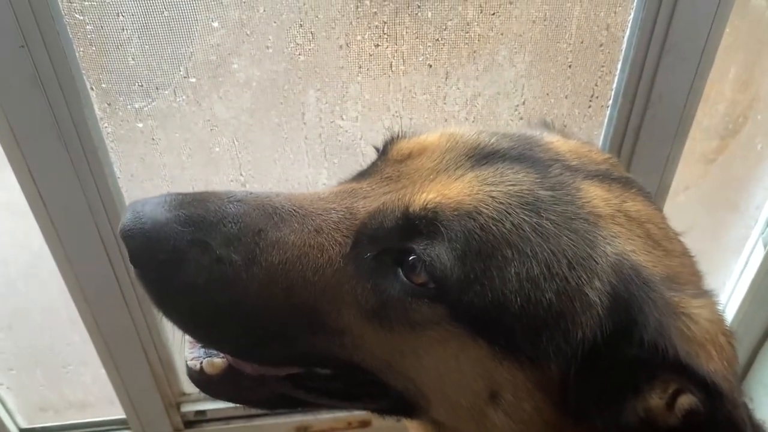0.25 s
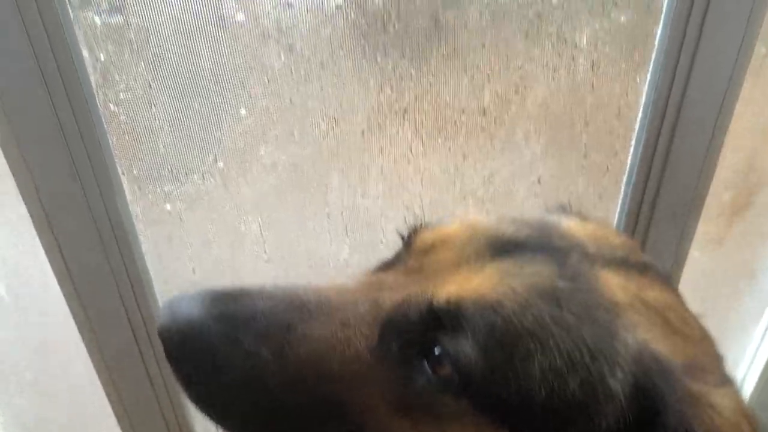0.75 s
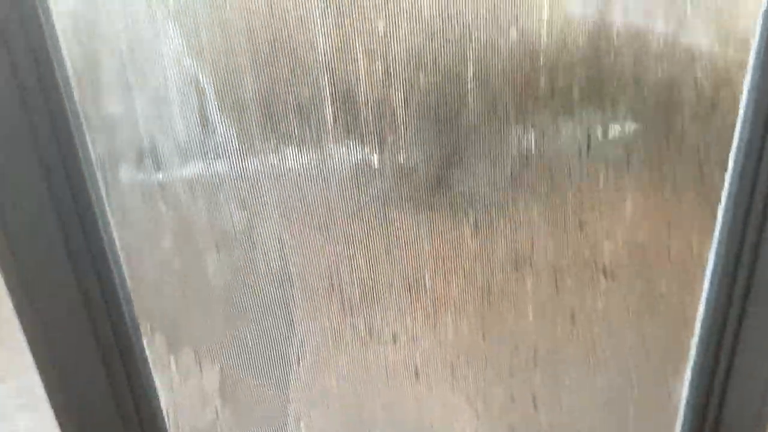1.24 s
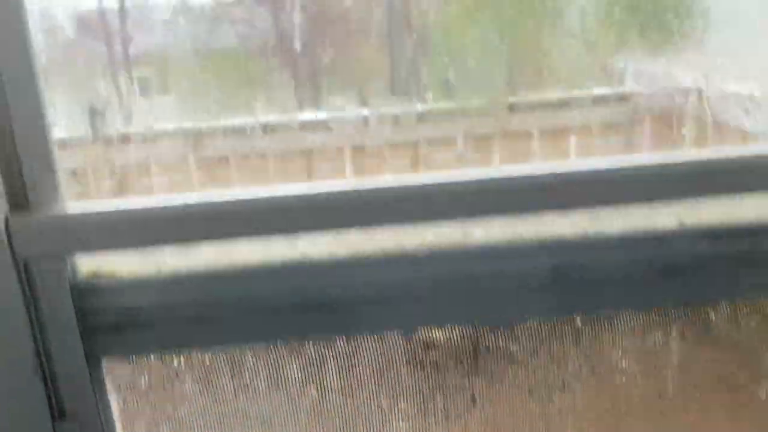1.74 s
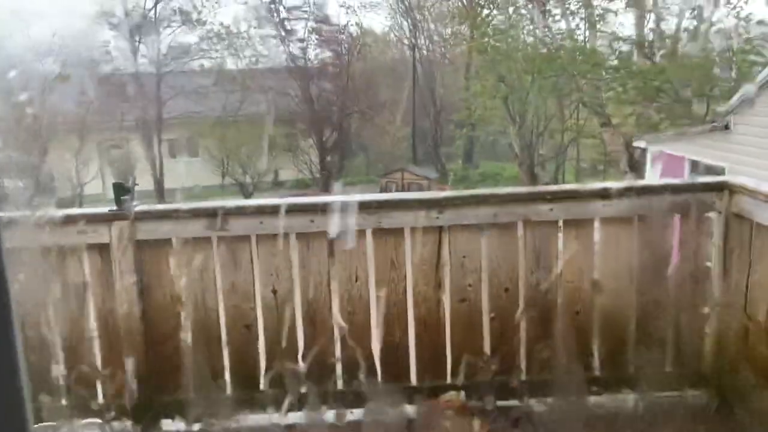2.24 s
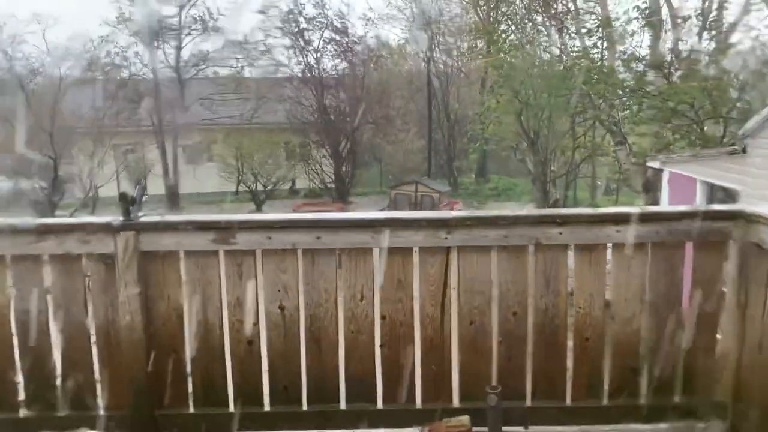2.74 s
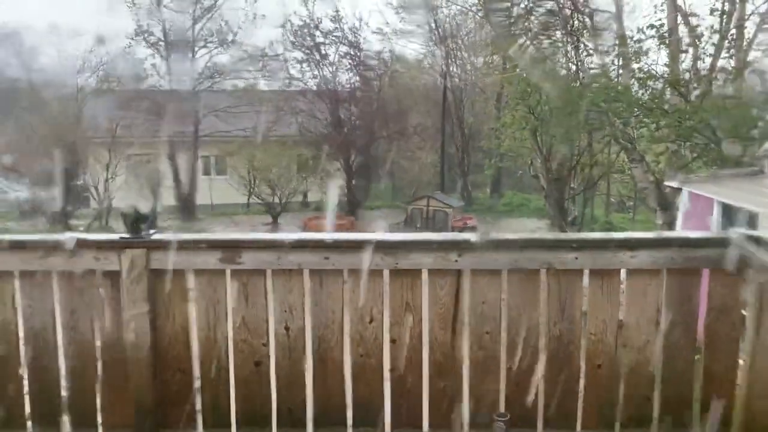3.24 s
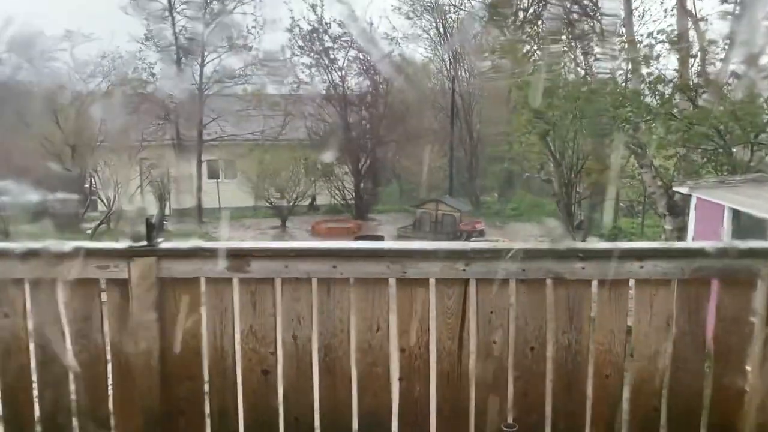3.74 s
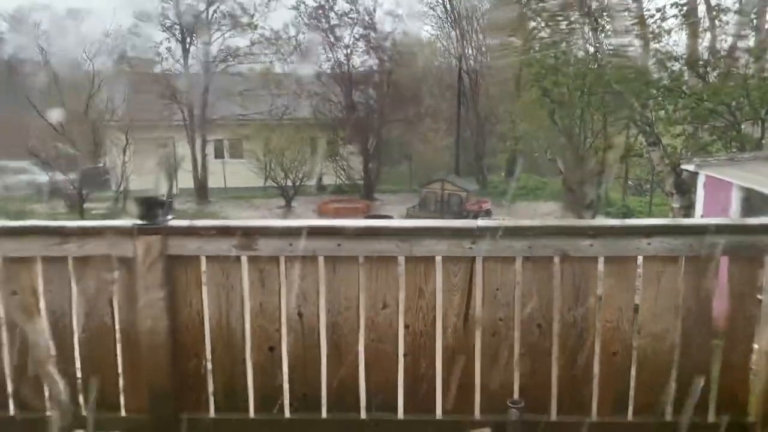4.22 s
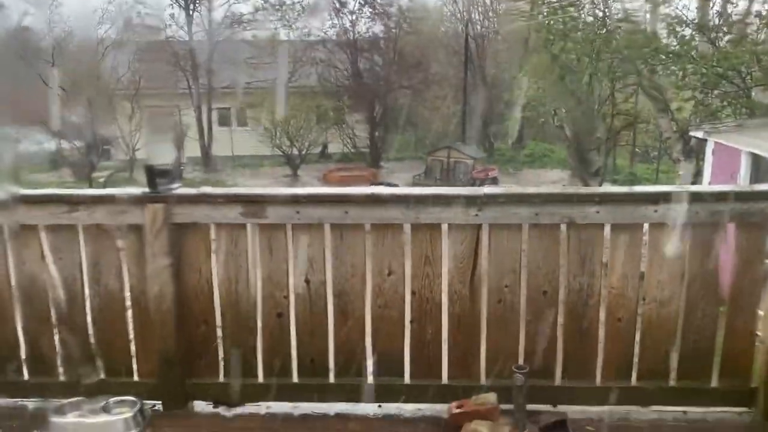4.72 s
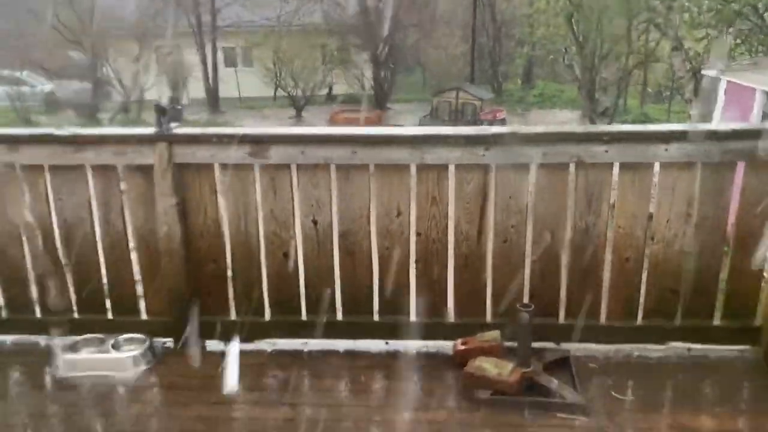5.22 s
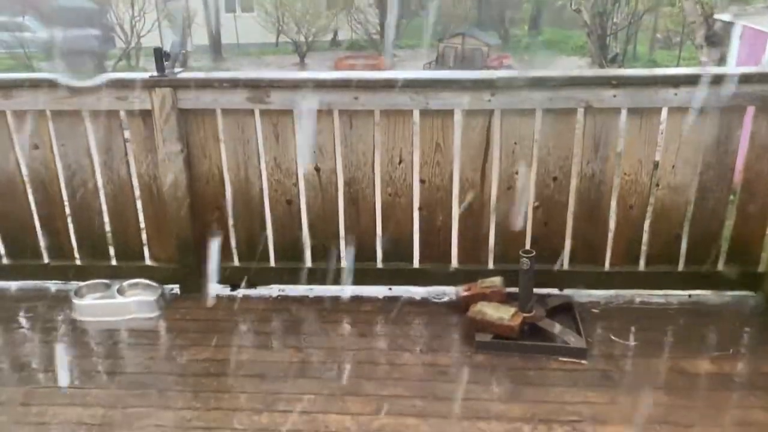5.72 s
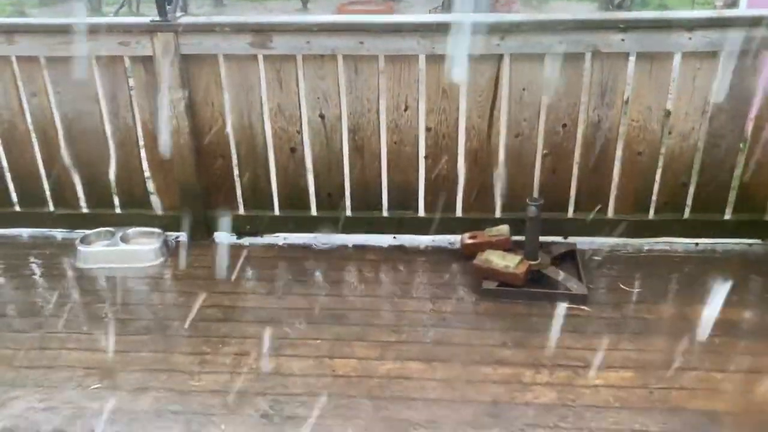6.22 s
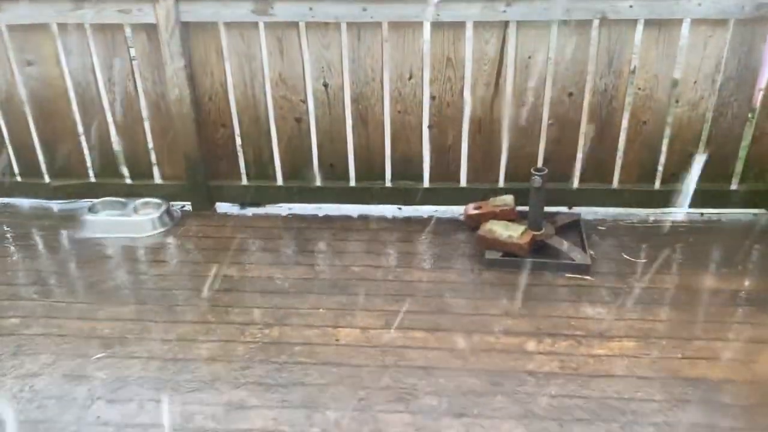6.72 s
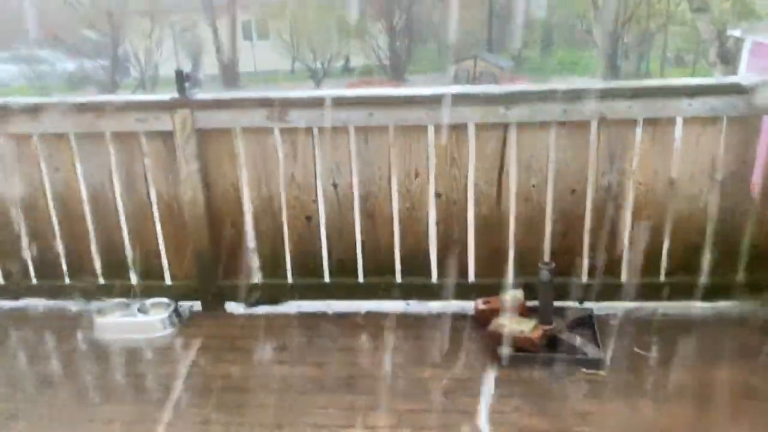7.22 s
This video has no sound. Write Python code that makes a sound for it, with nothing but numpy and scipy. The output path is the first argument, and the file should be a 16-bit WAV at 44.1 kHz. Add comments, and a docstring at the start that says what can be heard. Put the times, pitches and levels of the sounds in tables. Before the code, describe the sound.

Heard from just behind a screened window, a dense downpour hisses steadily over a low drumming on roof and deck that slowly swells. Sharp hailstones crack and tick on pane and sill from the very start, sparse at first, then more frequent. Fat drops and pellets clack on wet boards, small gushes slap, and later a few heavy knocks and low thuds shake the window. Handheld phone, close stereo.

```python
"""Heavy rain and hail on a wooden deck

Heard from just behind a screened window. Shaped noise gives the far hiss and the drumming of roof and deck,
which grows; brief damped sines give the near drops. Hailstones and pellets are short noise bursts, and pane
and wooden frame ring in decaying modes; the pane also gives a few low thuds. A phone's two ports listen."""
import sys
import numpy as np
from scipy import signal
from scipy.fft import rfft, irfft, next_fast_len
from scipy.io import wavfile
from scipy.ndimage import uniform_filter1d, map_coordinates

SR = 44100
rng = np.random.default_rng(int(sys.argv[2]) if len(sys.argv) > 2 else 0)


def file_out(sig):
    """Save sig as 16-bit WAV at sys.argv[1]."""
    # one column per channel
    cols = np.atleast_2d(sig).T
    # limit, then scale
    lim = np.clip(cols, -1, 1)
    pcm = np.round(lim * 32767).astype(np.int16)
    wavfile.write(sys.argv[1], SR, pcm)


N = 328986

# Low knock of pane or frame, noise spectrum. Each row: frequency in Hz, level in dB.
KNOCK_SPECTRUM = [(100, 0), (400, -25), (800, -6), (1500, -7), (2200, -10), (5000, -47)]


def amp(db):
    """Decibels to gain."""
    return 10 ** (np.asarray(db) / 20)


def unit(x):
    """Scale to rms 1."""
    return x / np.sqrt(np.mean(x ** 2) + 1e-20)


def along(points, hz):
    """Join (Hz, value) points by straight lines on a log frequency axis."""
    f, v = np.transpose(points)
    return np.interp(np.log(hz + 1), np.log(f), v)


def curves(rows):
    """One value per sample for each column after the time in seconds."""
    s, *cols = np.transpose(rows)
    return [np.interp(np.arange(N) / SR, s, c) for c in cols]


def wobble(rate_hz):
    """Smooth random curve with rate_hz knots a second."""
    knots = rng.standard_normal(int(N * rate_hz / SR) + 4)
    return map_coordinates(knots, [np.arange(N) * rate_hz / SR])


def filtered(x, response):
    """Multiply the spectrum of x by a response of frequency in Hz."""
    n = x.shape[-1]
    m = next_fast_len(n + 4096)
    return irfft(rfft(x, m) * response(np.fft.rfftfreq(m, 1 / SR)), m)[..., :n]


def coloured(x, spectrum):
    """Filter x by (Hz, dB) points, then scale to rms 1."""
    return unit(filtered(x, lambda hz: amp(along(spectrum, hz))))


def add(track, s, sound):
    """Mix a sound into a track at s seconds."""
    start = max(round(s * SR), 0)
    part = track[:, start:start + sound.shape[-1]]
    part += sound[..., :part.shape[-1]]


def rush(patchy_db):
    """Two unrelated noises sharing random patches of gain over time and frequency."""
    z = signal.stft(rng.standard_normal((2, N)), nperseg=512)[2]
    field = rng.standard_normal(z.shape[1:])
    field = uniform_filter1d(uniform_filter1d(field, size=12, axis=0), size=7, axis=1)
    return signal.istft(z * amp(patchy_db * unit(field)), nperseg=512)[1][:, :N]


def drops(count, spread_db, life_s, scatter_s, order=4, fade_db=10):
    """Each drop bursts into a few damped splashlets near its own pitch, the later ones weaker."""
    when, pitch, size = rng.random((3, count, 1))
    delay, detune, weight = rng.random((3, count, order))
    start = ((when * N / SR + scatter_s * delay ** 2) * SR).astype(int).reshape(-1, 1)
    hz = ((1500 + 8000 * pitch) * 2 ** (detune - .5)).reshape(-1, 1)
    mass = np.minimum(-np.log(1 - size), 2.5)
    gain = (amp(spread_db * mass - fade_db * delay ** 2) * (1 + weight)).reshape(-1, 1)
    k = np.arange(96)  # samples
    shape = gain * np.exp(-k / SR / life_s) * (1 - np.exp(-k / 2))
    where = (start + k).ravel()
    out = []
    for phase in 2 * np.pi * rng.random((2, len(hz), 1)):
        splashlets = shape * np.sin(2 * np.pi * hz * k / SR + phase)
        out.append(np.bincount(where, splashlets.ravel(), N)[:N])
    return np.array(out)


def echoes(x, t60_s, wet_db):
    """Wall, fence and window recess add a short diffuse tail of decaying noise."""
    t = np.arange(SR // 5) / SR
    tail = rng.standard_normal((2, len(t))) * amp(-60 * t / t60_s)
    wet = signal.fftconvolve(x, tail / np.linalg.norm(tail[0]), axes=1)[:, :N]
    return x + amp(wet_db) * wet


def storm(mean_db, growth):
    """Level in dB of a layer that gains growth dB per dB of downpour strength."""
    # Strength of the downpour; only its departure from the mean counts. Each row: time in seconds, strength in dB.
    strength_rows = [(0.05, -36.5), (0.34, -43.5), (1.02, -39.5), (1.78, -37), (2.2, -36), (3.25, -38),
                     (3.7, -39), (4.84, -35), (5.15, -34.5), (5.52, -34.5), (6.06, -34.5), (6.34, -32),
                     (6.78, -36), (7.46, -35.5)]
    strength_db, = curves(strength_rows)
    return mean_db + growth * (strength_db - strength_db.mean())


def rain(flurry_hz=16, far_swing_db=1.0, near_swing_db=1.4):
    """Far rain merges to a hiss; nearer drops on wet boards sound singly; both swell in flurries."""
    # Spectra of far hiss, fine spray and near splashes. Each row: frequency in Hz, level in dB.
    hiss_spectrum = [(500, -41), (1000, -9), (1500, -5), (2300, 0), (3500, -7), (5000, -7), (6000, -12.5),
                     (8000, -10), (10500, -13), (14000, -18.5), (16000, -71)]
    spray_spectrum = [(3000, -30), (5900, -12), (6800, -1.5), (7800, 0), (8400, -2), (9200, -6),
                      (10500, -8), (12200, -9), (14300, -17), (15200, -27), (16000, -32)]
    splash_spectrum = [(600, 1), (1500, -4.5), (2500, 2.5), (4300, 3), (5900, -6.5), (7000, -1),
                       (8000, 6.5), (9500, -19), (12000, 3.5), (14200, -3), (16000, -45)]
    flurry = wobble(flurry_hz)

    hiss_db = storm(mean_db=-37, growth=0.51) + far_swing_db * flurry
    hiss = amp(hiss_db) * coloured(rush(patchy_db=1.9), hiss_spectrum)

    fine = unit(drops(count=6000, spread_db=0.0, life_s=0.000097, scatter_s=0.00084))
    mist = unit(rush(patchy_db=3.0)) + fine
    spray = amp(storm(mean_db=-41.5, growth=0.83)) * coloured(mist, spray_spectrum)

    patter = drops(count=1400, spread_db=5.5, life_s=.00036, scatter_s=.0055, order=6)
    near = echoes(patter, t60_s=.08, wet_db=-11)
    splash_db = storm(mean_db=-39.5, growth=1) + near_swing_db * flurry
    return hiss + spray + amp(splash_db) * coloured(near, splash_spectrum)


def drumming():
    """Countless blows on roof and deck merge to a rumble, noise lifted at the room's resonances."""
    # Rumble ahead of the resonances. Each row: frequency in Hz, level in dB per Hz.
    rumble_spectrum = [(18, -26), (30, -17), (39, -15), (47, 1.5), (64, 0), (90, -3.5), (130, -2.5),
                       (165, -8), (230, -8.5), (400, -11), (520, -12.5), (1000, -18), (1500, -26),
                       (3000, -47)]
    # Resonances of room and pane. Each row: centre in Hz, width in Hz, lift in dB.
    resonances = [(133.5, 17, 2.5), (180.5, 6.4, 6.5), (217, 11, 2), (282, 22, 4.5), (355, 11.6, 8),
                  (422.3, 10.3, 8), (576, 8.6, 4), (755, 22, 5), (1210, 250, 3.5)]
    # Level of the drumming. Each row: time in seconds, level in dB.
    level_rows = [(0.1, -32), (0.8, -31.3), (1.2, -30), (1.7, -30.5), (2.4, -29), (2.7, -30), (3.3, -29),
                  (3.9, -29), (4.5, -28.5), (4.75, -26.5), (5.1, -28.5), (5.45, -27), (5.75, -28),
                  (5.95, -28.5), (6.6, -28.5), (7.0, -28), (7.4, -28)]

    def lift(hz):
        return amp(sum(db / (1 + (2 * (hz - centre) / width) ** 2) for centre, width, db in resonances))
    rumble = unit(filtered(coloured(rush(patchy_db=1), rumble_spectrum), lift))
    level_db, = curves(level_rows)
    return amp(level_db) * rumble


def pane_ring(t, span, uneven_db=3, detune=0.017):
    """Modes of pane and sill answer a stone, uneven in strength with where it lands."""
    # Modes under a hailstone; span scales the decay. Each row: frequency in Hz, level in dB, t60 in seconds.
    pane_modes = [(2000, -15, 0.03), (2374, -1, 0.065), (2900, -20, 0.026), (3910, -20, 0.024),
                  (4290, -5, 0.067), (4870, -6.5, 0.092), (6700, 8, 0.025)]
    ring = 0
    for hz, level_db, t60_s in pane_modes:
        strength, shift = rng.standard_normal(2)
        decay = amp(level_db + uneven_db * strength - 60 * t / (t60_s * span))
        cycles = hz * (1 + detune * shift) * t + rng.random((2, 1))
        ring = ring + decay * np.sin(2 * np.pi * cycles)
    return ring


def hail(rise_s=0.0019, contact_t60_s=0.058, rattle_t60_s=0.14, rattle_db=3.0, lead_s=.0003, ring_db=-4):
    """Each stone cracks, sheds most sound in a few ms, then leaves a weak rattle of pane and splinters."""
    # Big stones on pane and sill. Each row: time in seconds, strength in dB, brightness (tick over crack) in dB,
    # after-rattle in dB; the part offsets below come on top.
    stones = [(0.0045, -10.5, -0.5, -12.5), (0.391, -26.5, 3, -17), (0.474, -32.5, -5.5, -1.5),
              (1.146, -31, 11, -15), (1.194, -25, -1.5, -5), (1.4499, -20.5, -0.5, -10),
              (1.495, -19, 6, -12), (2.1004, -27, -11, -19), (2.5062, -30, -7.5, 1.5),
              (2.765, -26.5, -5, -6.5), (3.1176, -19.5, -4, -8), (3.4169, -21, -3.5, -6),
              (3.6726, -15, -11.5, -11), (3.856, -31.5, -18, -9), (4.3046, -30.5, -7, -25),
              (4.383, -24, -2, -7), (4.442, -26.5, -1, 0), (4.8494, -34, 2, -1.5),
              (5.2088, -25.5, -18, -5.5), (5.3862, -23, -11, -5), (5.512, -26, -12, -14),
              (5.566, -15, 1, -10.5), (5.8392, -25, 11, -8.5), (5.919, -26.5, -6, -20),
              (6.0789, -12.5, 7.5, -11.5), (6.321, -21.5, 5, -14), (6.4625, -21.5, 0, -20),
              (6.5072, -27, 4, -1.5), (6.57, -27.5, 3, -21), (6.7034, -31, -14, -8), (7.252, -21.5, 7, -14),
              (7.3365, -24.5, -1, -7.5), (7.3994, -28.5, -4, -14)]
    # Spectra of crack and high tick. Each row: frequency in Hz, level in dB.
    crack_spectrum = [(800, -17), (1900, -2.5), (2700, 1), (4800, 1), (6000, -7), (8000, -51)]
    tick_spectrum = [(4000, -19.5), (6000, -8.5), (7200, -0.5), (8600, -1.5), (9600, -1), (11500, -2),
                     (14000, -7), (16000, -18)]
    out, t = np.zeros((2, N)), np.arange(SR // 7) / SR
    for s, db, bright_db, after_db in stones:
        # a harder contact moves energy from crack to tick
        crack_db = db - 10 * np.log10(1 + amp(bright_db) ** 2)
        # a softer one tilts the tick further down, 1 dB per octave per dB of brightness
        tilt_db = np.clip(bright_db, -15, -2)
        tick = [(hz, level + tilt_db * np.log2(hz)) for hz, level in tick_spectrum]
        # a clean rebound is shorter and sharper than a stone that shatters
        span = amp(after_db / 2)
        swell = 1 - np.exp(-(t / rise_s / span) ** 2)
        rattle = amp(after_db + rattle_db - 60 * t / rattle_t60_s)
        # spectrum, level in dB, decay multiple: low modes of the pane outlast the high ones
        parts = ((KNOCK_SPECTRUM, db - 11, 1.6),
                 (crack_spectrum, crack_db + 2, 1),
                 (tick, crack_db + bright_db + 5.0, .8))
        for spectrum, part_db, hold in parts:
            contact = amp(-60 * t / (contact_t60_s * hold * span)) / np.sqrt(span)
            noise = coloured(rng.standard_normal((2, len(t))), spectrum)
            add(out, s - lead_s, amp(part_db) * swell * np.hypot(contact, rattle) * noise)
        add(out, s - lead_s, amp(crack_db + ring_db) * swell * pane_ring(t, span))
    return out


def pellets(level_db=-5.0, focus_db=22, rise_s=0.00023, t60_s=0.011,
            scatter_db=-13, scatter_t60_s=0.14, edge_hz=8800):
    """A small pellet clacks on the boards around one pitch and throws up a brief scatter of water."""
    # Pellets and fat drops. Each row: time in seconds, level in dB re level_db, centre in Hz.
    hits = [(0.193, -23, 7900), (0.26, -26, 2900), (0.339, -17, 3460), (0.3513, -17, 7350),
            (0.4476, -19, 3060), (0.596, -21, 4000), (0.634, -17, 7560), (0.7861, -16, 3920),
            (0.9223, -21, 7410), (1.021, -20, 3000), (1.3334, -20.5, 3150), (1.394, -23, 7900),
            (1.6706, -27, 7190), (1.904, -22, 3500), (2.007, -20, 7500), (2.101, -16, 4900),
            (2.381, -16.5, 4950), (2.406, -17, 4100), (2.477, -15.5, 3170), (2.5995, -23, 4530),
            (2.616, -17, 4300), (2.6793, -17.5, 3880), (2.7385, -23, 5090), (2.855, -17, 3300),
            (2.939, -26, 3600), (3.036, -23, 3800), (3.158, -18, 7600), (3.2148, -13, 3700),
            (3.318, -18, 7800), (3.509, -20, 7200), (3.6446, -14, 7040), (3.856, -13, 7100),
            (3.922, -17, 7640), (4.008, -19, 7540), (4.068, -18, 1950), (4.081, -19, 7550),
            (4.128, -28, 3800), (4.149, -22, 3890), (4.161, -13.5, 7160), (4.173, -18, 7300),
            (4.219, -20, 2600), (4.305, -13.5, 7300), (4.535, -22, 3300), (4.6204, -21, 4010),
            (4.678, -15, 3100), (4.785, -16.5, 3300), (4.862, -13, 2200), (5.098, -13, 6900),
            (5.212, -9, 7300), (5.283, -15, 7800), (5.469, -15, 7900), (5.512, -15, 7500),
            (5.671, -13, 3970), (5.79, -12, 4070), (5.8808, -15.5, 3130), (5.917, -24, 7750),
            (5.987, -13, 6400), (6.181, -11.5, 3620), (6.271, -19, 7900), (6.284, -18, 4100),
            (6.3187, -7.5, 3530), (6.355, -17, 7100), (6.4693, -11.5, 7020), (6.6735, -18, 7310),
            (6.674, -19, 3300), (6.7033, -10, 7000), (6.889, -16.5, 3580), (6.9294, -16, 6760),
            (7.008, -21, 4100), (7.0263, -16, 3900), (7.103, -19, 7800), (7.143, -16, 7550),
            (7.21, -14, 3440), (7.3995, -14, 6800), (7.412, -20, 7700)]
    out, t = np.zeros((2, N)), np.arange(SR // 10) / SR
    scatter = amp(scatter_db - 60 * t / scatter_t60_s)
    shape = (1 - np.exp(-t / rise_s)) * np.hypot(amp(-60 * t / t60_s), scatter)
    for s, db, centre_hz in hits:
        def band(hz):
            octaves = np.log2((hz + 1) / centre_hz)
            peak = amp(-focus_db * np.log10(1 + (2 * octaves) ** 2))
            return peak / np.hypot(1, (hz / edge_hz) ** 6)
        clack = unit(filtered(rng.standard_normal((2, len(t))), band))
        add(out, s, amp(db + level_db) * shape * clack)
    return out


def gushes(focus_db=11):
    """A gush slaps on the boards as a quick cluster of drops that swells, then thins out."""
    # Gushes; each peaks at a third of its length. Each row: time in seconds, length in seconds, level in dB,
    # centre in Hz.
    slaps = [(0.072, 0.086, -36, 2800), (0.748, 0.073, -33, 4530), (0.83, 0.044, -33.5, 4270),
             (1.148, 0.074, -35.5, 3300), (1.996, 0.032, -32, 2670), (2.393, 0.049, -36.5, 4200),
             (3.163, 0.055, -29, 4930), (3.209, 0.021, -30, 3080), (4.064, 0.026, -32.5, 1980),
             (4.083, 0.054, -36.5, 3420), (4.141, 0.048, -33.5, 3630), (4.203, 0.028, -33.5, 2290),
             (4.785, 0.037, -29, 3380), (4.85, 0.042, -32, 2200), (5.262, 0.017, -29, 3140),
             (5.282, 0.038, -29, 3050), (5.398, 0.048, -28, 4120), (5.777, 0.088, -33.5, 3580),
             (6.507, 0.024, -30, 3980), (6.738, 0.047, -34, 2400), (7.111, 0.045, -28.5, 3000)]
    # Spectrum of the drops. Each row: frequency in Hz, level in dB.
    slap_spectrum = [(800, 6), (2000, -0.5), (2700, -2), (4300, -6.5), (6000, -9), (7500, 3), (12000, 7)]
    out, t = np.zeros((2, N)), np.arange(SR // 4) / SR
    cluster = coloured(drops(count=8000, spread_db=3.0, life_s=.0003, scatter_s=.002), slap_spectrum)
    for s, length_s, db, centre_hz in slaps:
        age = t / length_s * 3
        piece = cluster[:, int(s * SR):][:, :len(t)]
        water = filtered(piece, lambda hz: amp(-focus_db * np.log2((hz + 1) / centre_hz) ** 2))
        add(out, s, amp(db) * age * np.exp(1 - age) * unit(water))
    return out


def knocks(attack_s=0.00056, rough=0.62, puff_t60_s=0.11):
    """Heavy blows ring the wooden frame; each favours the modes near one pitch, higher if harder."""
    # Blows. Each row: time in seconds, level in dB, favoured pitch in Hz, decay multiple, fall one octave away in dB.
    blows = [(.002, -23, 296, 1, 3), (1.015, -32.5, 420, 1.3, 12), (1.451, -36, 1500, 1, 13),
             (2.273, -30.5, 700, 1.1, 12), (2.343, -28, 800, 1.1, 4.5), (3.119, -21, 1480, .9, 25),
             (3.1205, -25.5, 610, .9, 23), (3.419, -29, 397, 1, 12), (3.530, -24, 140, 1.2, 12),
             (3.673, -29, 2000, .8, 14), (3.6735, -29.5, 460, .8, 16), (4.145, -17.5, 130, 1, 9),
             (5.491, -17.5, 125, .9, 16), (6.072, -16.5, 140, .8, 8.5), (6.7445, -21, 650, 1.1, 9),
             (6.746, -27.5, 2100, 1.6, 14), (6.750, -20, 322, 1.4, 6.5), (6.793, -24, 180, .8, 3),
             (7.251, -27.5, 750, 1, 8), (7.2515, -27, 3000, .9, 25), (7.3365, -20.5, 770, .55, 17),
             (7.337, -36, 2730, .7, 5)]
    # Modes of the frame. Each row: frequency in Hz, level in dB, t60 in seconds at decay multiple 1.
    wood_modes = [(124.4, -6.5, 0.14), (149, -6, 0.22), (224, -4, 0.54), (279, -3.5, 0.38),
                  (352.8, 1, 0.17), (426.5, 5, 0.21), (562, 3.5, 0.11), (700, 8.5, 0.061), (805, 3, 0.078),
                  (1048, 6, 0.11), (1350, 6, 0.07), (1610, 8, 0.066), (1706, 3.5, .09), (2290, -4, .06),
                  (3300, 3, .028)]
    out, t = np.zeros((2, N)), np.arange(SR // 4) / SR
    for s, db, centre_hz, hold, focus_db in blows:
        def favour_db(hz):
            return -focus_db * np.log2((hz + 1) / centre_hz) ** 2
        ring = 0
        for hz, level_db, t60_s in wood_modes:
            strength_db = level_db + rng.normal(0, 1.5) + favour_db(hz)
            tone = np.sin(2 * np.pi * (hz * t + rng.random((2, 1))))
            ring = ring + amp(strength_db - 60 * t / (t60_s * hold)) * tone
        # countless weaker modes merge to a puff of noise
        noise = rng.standard_normal((2, len(t)))
        puff = unit(filtered(noise, lambda hz: amp(favour_db(hz) + .5 * along(KNOCK_SPECTRUM, hz))))
        body = .5 * ring + rough * amp(-60 * t / (puff_t60_s * hold)) * puff
        add(out, s, amp(db) * body * (1 - np.exp(-t / attack_s)))
    return out


def thuds(overtone=1.85, overtone_db=-10):
    """The whole pane swings for a few cycles, with a weaker overtone around the peak of the swell."""
    # Thuds. Each row: time in seconds, level in dB, pitch in Hz, swell to the peak in seconds.
    swings = [(2.25, -30, 49.6, 0.1), (4.142, -20.5, 69.7, 0.024), (5.489, -12, 65.5, 0.028),
              (6.081, -22.5, 66, 0.022), (6.765, -17.5, 65.6, 0.017)]
    out, t = np.zeros((2, N)), np.arange(SR // 2) / SR
    for s, db, hz, swell_s in swings:
        swing = (t / swell_s * np.exp(1 - t / swell_s)) ** 2
        turn = 2 * np.pi * hz * t
        second = amp(overtone_db) * swing * np.sin(overtone * turn)
        add(out, s, amp(db) * swing * (np.sin(turn) + second))
    return out


def ports(field, alike):
    """Two unrelated halves of the field reach the two ports partly alike, unequal and out of step."""
    # Level at the ports. Each row: frequency in Hz, left minus right in dB.
    balance_db = [(120, 0), (220, -2), (400, 1), (950, 3), (1700, 0), (2800, 5), (3600, 4.5), (5400, 8),
                  (7200, 1), (10000, -0.5)]
    # Phase at the ports. Each row: frequency in Hz, lead of left over right in radians.
    lead_rad = [(100, 0), (400, .5), (2700, 1), (4000, .3), (5400, 0), (6100, .7), (7300, -.4),
                (9050, -3.1), (11100, -6.3), (13150, -9.4), (15000, -12.5)]

    def split(hz):
        turn = np.arccos(np.clip(along(alike, hz), -1, 1)) / 2
        return np.array([np.cos(turn), np.sin(turn)])

    def placement(hz):
        gains = amp(np.outer([.5, -.5], along(balance_db, hz)))
        gains = gains / np.sqrt(np.mean(gains ** 2, axis=0))
        return gains * np.exp(1j * np.outer([.5, -.5], along(lead_rad, hz)))
    mid, side = filtered(field, split)
    return filtered(np.array([mid + side, mid - side]), placement)


def scene():
    """Rain and hail at the ports, closer blows on the frame, and thuds equal in both."""
    # Likeness of the ports for rain and hail, then for the close frame, which is more alike at low frequencies.
    # Each row: frequency in Hz, likeness from -1 to 1.
    rain_alike = [(100, 0.99), (220, 0.89), (320, 0.38), (560, 0.47), (740, -0.85), (1000, -0.001),
                  (1500, -0.56), (2000, 0.082), (2700, 0.5), (4000, 0.59), (5400, 0.15), (6700, 0.99),
                  (15000, 1)]
    frame_alike = [(150, 0.97), (450, 0.98), (800, 0.52), (1500, -0.14), (2600, 0.041), (5000, .5)]
    weather = rain() + drumming() + hail() + pellets() + gushes()
    return ports(weather, rain_alike) + ports(knocks(), frame_alike) + thuds()


def record(dry, top_hz=15900):
    """The phone keeps nothing above its band limit."""
    return filtered(dry, lambda hz: hz < top_hz)


dry = scene()
out = record(dry)
file_out(out)
```